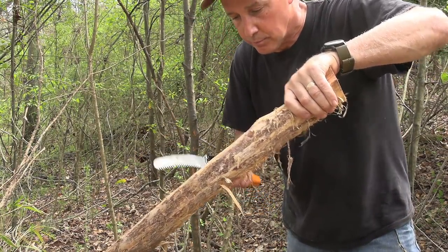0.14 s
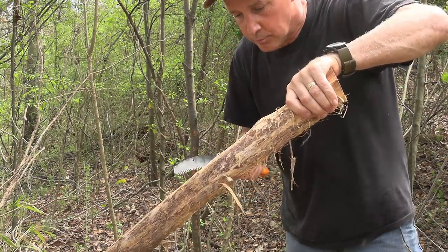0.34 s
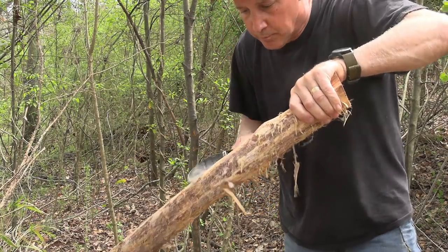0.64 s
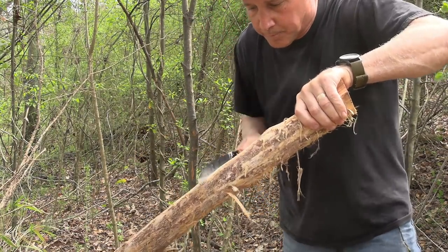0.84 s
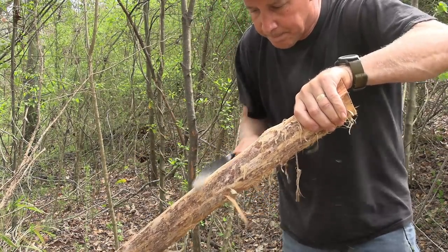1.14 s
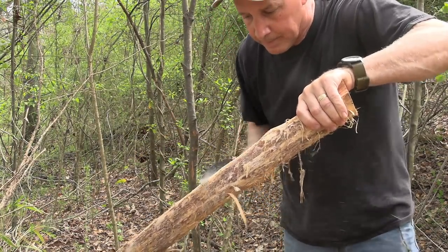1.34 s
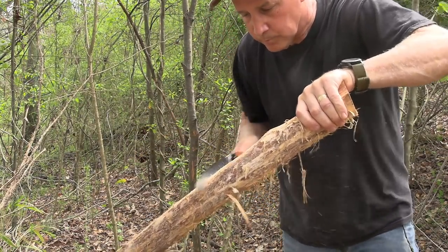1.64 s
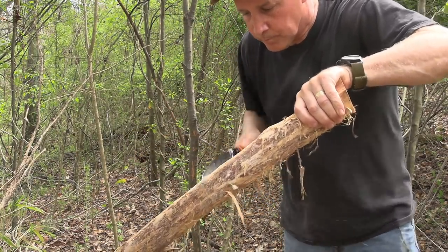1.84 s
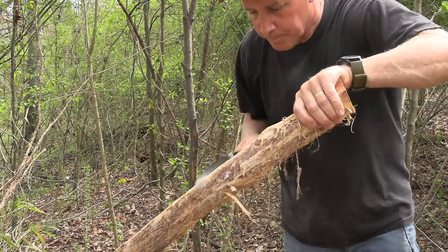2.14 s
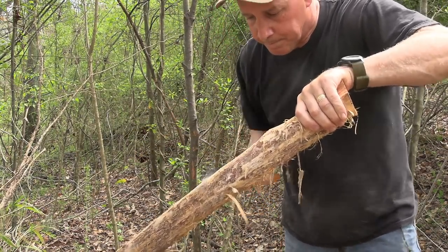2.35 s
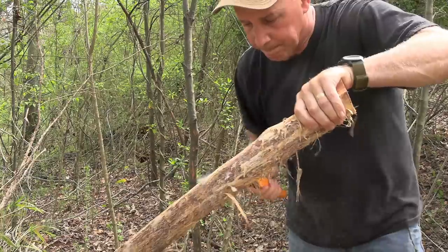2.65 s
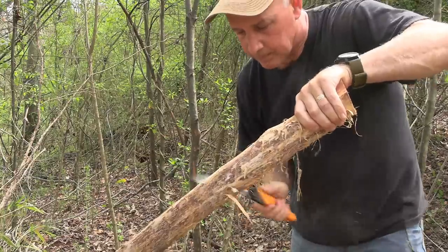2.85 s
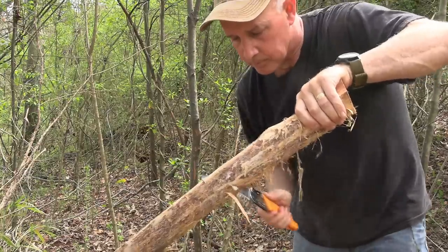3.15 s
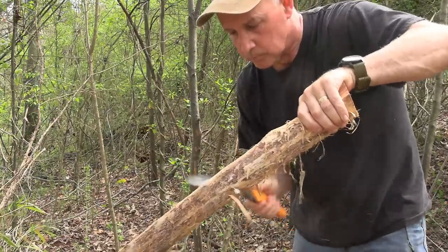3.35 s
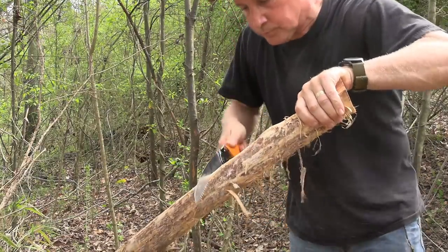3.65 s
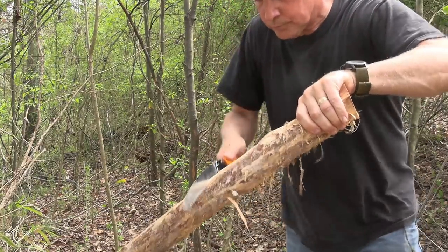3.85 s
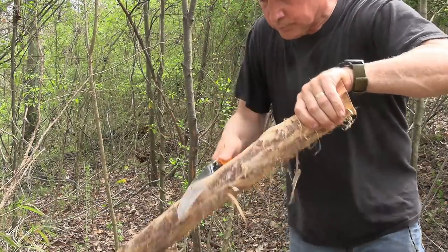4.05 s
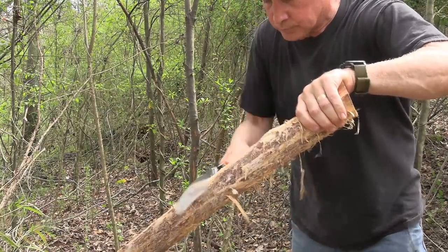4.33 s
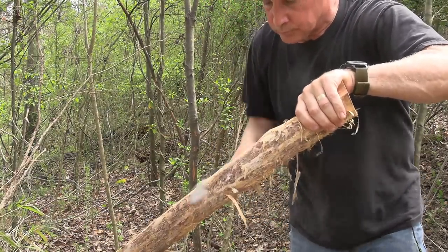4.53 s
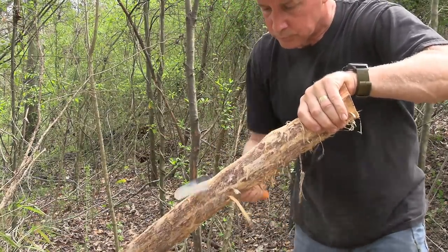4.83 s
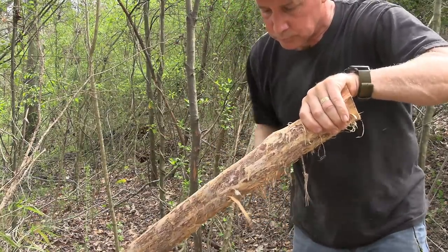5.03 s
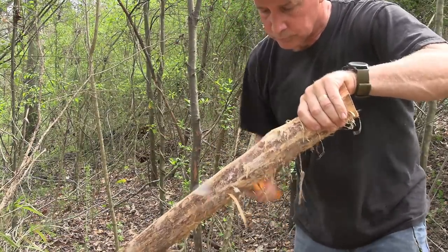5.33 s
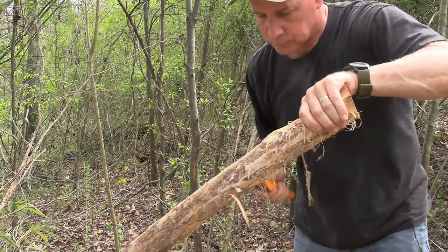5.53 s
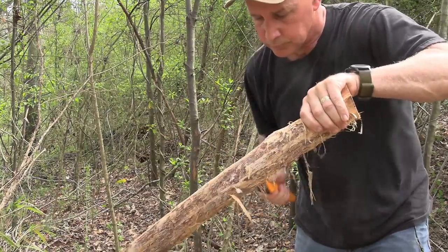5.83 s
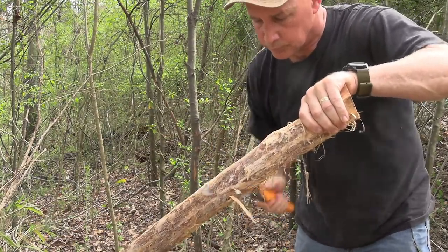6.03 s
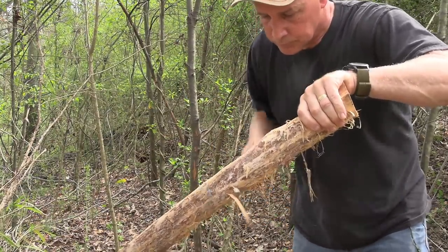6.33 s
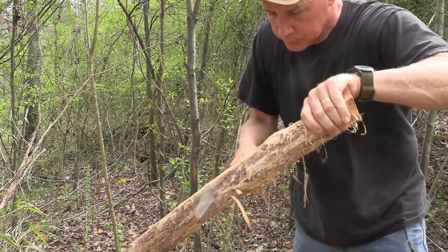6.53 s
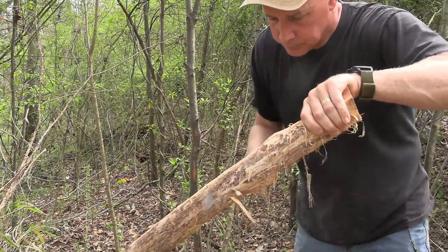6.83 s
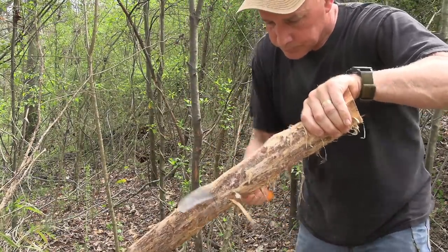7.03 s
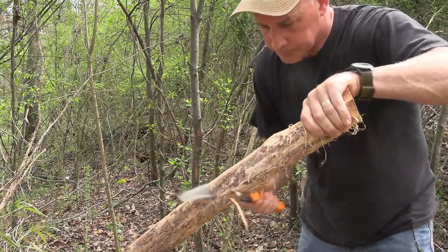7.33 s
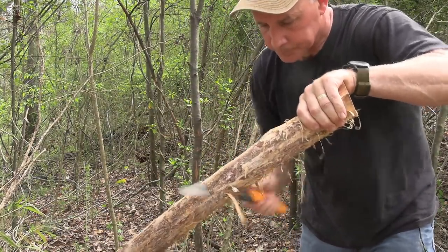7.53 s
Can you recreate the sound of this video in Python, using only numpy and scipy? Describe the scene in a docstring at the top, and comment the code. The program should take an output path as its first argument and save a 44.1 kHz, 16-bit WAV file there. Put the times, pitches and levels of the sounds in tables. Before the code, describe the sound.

In a wood, close to the microphone, a small hand saw cuts a dead limb with fast, alternating pull and push strokes, about seven or eight a second. Each stroke is a gritty, hollow woody rasp with a bright steely edge. A distant bird whistles downward twice early on. The sawing briefly rests near the middle, then resumes, as low wind rumble and buffeting grow heavy and later ease slightly.

```python
"""A folding pruning saw cuts a dead limb held in one hand, in a wood, close to the microphone.
A faint far-off roar (coloured noise) lasts throughout; from 0.2 s about seven and a half strokes a second,
pulls and pushes alternating: tearing fibres knock the limb's low resonances and ring the blade's treble.
A distant bird (gliding sines) falls twice before 0.9 s; the saw rests briefly near 3.7 s.
Wind rumble and buffeting on the microphone (noise under gusts) build to about 5.6 s, then ease."""
import sys
import numpy as np
from scipy import signal
from scipy.fft import rfft, irfft, next_fast_len
from scipy.io import wavfile
from scipy.ndimage import map_coordinates

SR = 44100
rng = np.random.default_rng(int(sys.argv[2]) if len(sys.argv) > 2 else 0)


def waveform_to_disk(signal):
    """Save audio, clipped to [-1, 1], as 16-bit WAV at the path in sys.argv[1]."""
    frames = np.transpose(np.atleast_2d(signal))
    scaled = np.clip(frames, -1, 1) * 32767
    samples = np.round(scaled).astype(np.int16)
    wavfile.write(sys.argv[1], SR, samples)


N = 338688
TIME = np.arange(N) / SR
FREQ = np.maximum(np.fft.rfftfreq(next_fast_len(N + 8192), 1 / SR), 1)  # no zero, for logs and division
SIZE = 2 * (len(FREQ) - 1)  # FFT length, with room for the filters to ring out
CATCH_S = 0.022  # the teeth catch this long after a stroke sets off

# pull strokes, the cutting direction: (start [s], length [s], force [dB], growl relative to force [dB])
PULL_STROKES = [(0.217, 0.16, -34.5, -4), (0.569, 0.138, -29, 3), (0.832, 0.124, -27.5, -2.5),
                (1.071, 0.12, -29.5, -5), (1.324, 0.12, -28, -22), (1.563, 0.133, -28.5, 0),
                (1.822, 0.122, -26.2, -5), (2.075, 0.141, -28.5, 1), (2.331, 0.134, -24.5, -6),
                (2.594, 0.12, -25, -1), (2.851, 0.134, -26, -4), (3.12, 0.116, -28.5, -15),
                (3.366, 0.154, -31.0, -9), (3.935, 0.12, -29.5, -5), (4.17, 0.164, -29.5, -5),
                (4.432, 0.148, -29.5, 1), (4.697, 0.145, -28, 1.5), (4.96, 0.155, -30, 0.5),
                (5.224, 0.157, -31.5, 2), (5.51, 0.135, -31.8, -3), (5.782, 0.14, -31, 0),
                (6.06, 0.139, -32, -6), (6.326, 0.155, -33.5, -6), (6.596, 0.155, -31.5, -6),
                (6.873, 0.159, -30.5, 3), (7.142, 0.15, -28.5, -6), (7.426, 0.14, -27, -2)]
# push strokes, the lighter return: (start [s], length [s], force [dB], growl relative to force [dB])
PUSH_STROKES = [(0.48, 0.094, -37, 11.5), (0.731, 0.11, -34.5, -10), (0.964, 0.12, -30, 2.5),
                (1.211, 0.1, -28.5, -1), (1.45, 0.11, -31.5, -11), (1.698, 0.12, -31.5, 2.5),
                (1.954, 0.115, -27, -5), (2.204, 0.13, -29.5, -2.5), (2.463, 0.13, -29, -4.5),
                (2.72, 0.14, -27.5, 1.5), (2.98, 0.13, -31.5, 5), (3.248, 0.12, -30.5, 1),
                (3.512, 0.125, -38, 0), (3.819, 0.069, -36.5, -17), (4.042, 0.13, -29.5, 0.5),
                (4.31, 0.12, -31.5, -8), (4.583, 0.12, -32.5, 5.5), (4.841, 0.12, -32.5, 2.5),
                (5.095, 0.146, -33.5, 2.5), (5.379, 0.12, -33.5, -3.5), (5.654, 0.13, -35, 2),
                (5.939, 0.119, -32.5, -2.5), (6.212, 0.12, -35.5, 1.5), (6.476, 0.12, -34, -9),
                (6.744, 0.12, -35, -2), (7.013, 0.132, -29.5, 6), (7.292, 0.12, -28.5, 1),
                (7.569, 0.13, -31, 0)]
# resonances of the steel blade: (frequency [Hz], width [Hz], relative level [dB])
BLADE_MODES = [(8580, 220, -2.5), (9950, 270, 0), (11000, 420, -3), (12000, 370, 2.5), (13500, 154, 9.5),
               (12900, 220, -8)]
# outline of the hiss of tearing fibres: (frequency [Hz], relative level [dB])
TEAR_OUTLINE = [(200, -58), (1000, 0), (2500, -27.5), (3500, -4.5), (5000, 1.5), (7000, 0), (9000, 6),
                (12000, -11), (16000, 4)]


def undb(db):
    """Decibels to gain."""
    return 10 ** (np.asarray(db) / 20)


def unit(x):
    """Scale to rms 1."""
    return x / np.sqrt(np.mean(np.abs(x) ** 2))


def noise():
    """White noise."""
    return rng.standard_normal(N)


def walk(rate):
    """A random wander with rms 1 that takes a new direction up to rate times a second."""
    return unit(np.interp(TIME * rate, np.arange(N // 16), rng.standard_normal(N // 16)))


def curve(rows):
    """Join (s, value) rows by straight lines."""
    return np.interp(TIME, *np.transpose(rows))


def filtered(x, response):
    """Apply a frequency response."""
    return irfft(rfft(x, SIZE) * response, SIZE)[:N]


def colour(x, points):
    """Filter by a (Hz, dB) outline, keeping the power of white noise."""
    hz, db = np.transpose(points)
    outline_db = np.interp(np.log(FREQ), np.log(hz), db)
    return filtered(x, unit(undb(outline_db)))


def resonance(hz, width, db):
    """Frequency response of one damped mode."""
    return undb(db) / (1 + 1j * (FREQ - hz * hz / FREQ) / width)


def ring(x, modes):
    """Drive (Hz, width, dB) resonances, keeping the power of white noise."""
    return filtered(x, unit(sum(resonance(*mode) for mode in modes)))


def die_away(blows, decay_s):
    """Let each blow decay exponentially."""
    return signal.lfilter([1], [1, -np.exp(-1 / (decay_s * SR))], blows)


def bursts(events, decay_s):
    """Envelope of sudden (s, dB) blows that die away."""
    s, db = np.transpose(events)
    blows = np.bincount((s * SR).astype(int), undb(db), N)
    return die_away(blows, decay_s)


def swing(t, start, crest, end):
    """Rise from rest to a crest and back to rest: a lopsided half sine."""
    return np.maximum(np.sin(np.pi * np.interp(t, [start, crest, end], [0, .5, 1])), 0)


def distance(waver_db=1):
    """A soft far-off roar among the trees: coloured noise that wavers a little."""
    # outline of the roar: (frequency [Hz], relative level [dB])
    roar_outline = [(60, -25), (130, 1.5), (250, -8), (400, -5), (750, -8.5), (1100, -18), (2000, -26.5),
                    (3000, -31.5), (5000, -33.5), (10000, -42), (16000, -74)]
    # level of the roar before its waver: (time [s], level [dB])
    roar_level = [(0, -42.5), (3, -42.5), (3.8, -46), (6, -47.5), (7.68, -46.5)]
    return colour(noise(), roar_outline) * undb(curve(roar_level) + waver_db * walk(10))


def bird():
    """Falling whistles from far away: gliding sines, blurred by the air between the trees."""
    # (start [s], end [s], first pitch [Hz], last pitch [Hz], level before flutter [dB])
    whistles = [(.41, 0.61, 3000, 2500, -60), (.68, 0.865, 2960, 2520, -53)]
    blur_hz, flutter_db = 35, 3
    out = 0
    for start, end, from_hz, to_hz, db in whistles:
        pitch_hz = curve([(start, from_hz), (end, to_hz)]) + blur_hz * walk(200)
        tone = np.sin(2 * np.pi * np.cumsum(pitch_hz) / SR)
        swell = swing(TIME, start, (start + end) / 2, end)
        out = out + undb(db + flutter_db * walk(59.6)) * swell * tone
    return out


def wind(buffet_db=0.5):
    """Eddies press on the microphone, the largest swings rounded off; gusts add faster buffeting."""
    # strength of the breeze at the microphone: (time [s], relative level [dB])
    breeze = [(0, -52), (.8, -45.5), (1.6, -43), (2.5, -32.5), (3.4, -32.5), (4.3, -26.5), (5.6, -20.5),
              (6.4, -23.5), (7.68, -28.5)]
    # gusts on top of the breeze: (peak time [s], relative level [dB])
    gusts = [(.23, -30), (1.11, -24.5), (1.902, -23), (3.1, -14), (5.05, -21.5), (5.55, -15.5),
             (6.159, -18), (6.45, -27), (7.12, -13)]
    # outline of the slow rumble: (frequency [Hz], relative level [dB])
    rumble_outline = [(5, -10.5), (12, 14.5), (22, 1.5), (34, 1.5), (48, -11), (62, -31.5), (100, -21.5),
                      (200, -93)]
    # outline of the faster buffeting: (frequency [Hz], relative level [dB])
    buffet_outline = [(30, -50), (48, 2.5), (60, 1.5), (80, -13.5), (110, -26), (150, -29.5), (250, -42),
                      (600, -70)]
    gust_rise_s, gust_fall_s = 0.044, 0.048
    lurch_db, lurches_per_s = 1.5, 12  # the wind also lurches at random
    # the rumble has this level at the usual wind, and grows by this many dB per dB of wind
    rumble_db, usual_wind_db, rumble_growth = -9.5, -27, 0.3
    ceiling = .76  # largest swing of the wind rumble and buffeting

    strength = undb(curve(breeze))
    for peak, db in gusts:
        age = TIME - peak
        spread_s = np.where(age < 0, gust_rise_s, gust_fall_s)
        strength = strength + undb(db) * np.exp(-(age / spread_s) ** 2)
    strength = strength * undb(lurch_db * walk(lurches_per_s))
    rumble_gain = undb(rumble_db) * (strength / undb(usual_wind_db)) ** rumble_growth
    slow = rumble_gain * colour(noise(), rumble_outline)
    fast = undb(buffet_db) * strength * colour(noise(), buffet_outline)
    return ceiling * np.tanh((slow + fast) / ceiling)


def trees(x, echo_db=-24, dull_hz=5000):
    """Trunks scatter a thin, dull tail: decaying noise through a gentle low-pass."""
    t60_s = .28
    tail = noise() * np.exp(-np.log(1000) * TIME / t60_s) * (TIME > .012)  # first echo after 12 ms
    tail = filtered(tail / np.sqrt(np.sum(tail ** 2)), 1 / (1 + 1j * FREQ / dull_hz))
    return undb(echo_db) * signal.fftconvolve(x, tail)[:N]


def crumbs(db, decay_s=0.003):
    """From the first push on, splinters and sawdust crackle faintly, also between strokes."""
    per_second, scatter_db = 450, 4
    begun = TIME > PUSH_STROKES[0][0]
    ticks = (rng.random(N) < per_second / SR) * undb(scatter_db * noise()) * begun
    crackle = die_away(ticks, decay_s) * noise()
    return undb(db) * ring(crackle, [(3000, 5000, 6.5), (7700, 3500, 2.5)])


def jolts(limb, db=-5):
    """The blade jams: each jam is one hard, brief push that knocks the limb's resonances."""
    # (time [s], relative level [dB])
    jams = [(2.803, -7), (4.135, -29), (4.144, -7), (4.922, -27)]
    push_s = .0003
    return undb(db) * ring(bursts(jams, push_s), limb)


def snags(blade_db=-2, tear_db=-8):
    """A tooth catches and snaps free with a bright tick; the fibre crackles on for a moment."""
    # single snags, faint to hard, where teeth skip or a fibre snaps:
    # (time [s], relative level [dB], blade ring relative to it [dB])
    single_snags = [(.1955, -39, -22), (.2642, -17, -7.5), (.2797, -17.5, -1), (.298, -17, -16),
                    (.342, -23, 1.5), (.52, -28, 8), (1.098, -24, -3), (1.5095, -19.5, 0.5),
                    (1.9692, -25, -6), (2.0959, -18, -8), (2.2248, -26, -8), (2.3523, -16, -16),
                    (3.015, -20, -25), (3.1464, -13, -10), (3.3955, -27, -14), (3.7255, -31, -29),
                    (3.7758, -23.5, -25), (3.9555, -27, -12), (4.4537, -18.5, -9), (6.1207, -16, -7)]
    decay_s, tail_s, tail_db = .0011, .014, -10
    # the catch as each pull sets off: level relative to its force, blade ring, random spread of level
    catch_db, catch_ring_db, scatter_db = -7, -14, 2.5

    ticks = list(single_snags)
    for start, _, force_db, _ in PULL_STROKES:
        luck_db = scatter_db * rng.standard_normal()
        ticks.append((start + CATCH_S, force_db + catch_db + luck_db, catch_ring_db))

    def snap(events):
        """Noise under a sharp tick and its weaker tail."""
        return (bursts(events, decay_s) + undb(tail_db) * bursts(events, tail_s)) * noise()

    fibres = snap([(s, db) for s, db, _ in ticks])
    steel = snap([(s, db + ring_db) for s, db, ring_db in ticks])
    return undb(blade_db) * ring(steel, BLADE_MODES) + undb(tear_db) * colour(fibres, TEAR_OUTLINE)


def break_free(age, stick_s, skid_db=-20):
    """After each turn the teeth drag briefly, then ease loose: a gate for the rasp and the skid's envelope."""
    drag_db, release_s, skid_s = -3, .012, .015
    loose = np.clip((age - stick_s) / release_s + .5, 0, 1)
    gate = undb(drag_db * (1 - loose))
    skid = loose * undb(skid_db) * np.exp(-np.abs(age - stick_s) / skid_s)
    return gate, skid


def arm(strokes, style, wood_peakiness, rattle=0.07, coast=.6, dig=2.6):
    """Tooth rate, strength of the rasp, force on the wood and strength of the growl through all strokes."""
    bite_lag_s = .008  # the teeth bite deepest just after the fastest moment
    usual_stroke_s = .13  # tooth rates hold for this length and scale with 1 / length
    rate, rasp, bite, growl = np.zeros((4, N))
    when, *habits = np.transpose(style)
    for start, length, force_db, growl_db in strokes:
        share, pointed, tooth_hz, hiss_db = (np.interp(start, when, habit) for habit in habits)
        end = start + length
        fastest = start + length * np.clip(share, .1, .85)
        on = slice(int(start * SR), int(end * SR))
        speed = swing(TIME[on], start, fastest, end)
        press = swing(TIME[on], start, min(fastest + bite_lag_s, end), end)
        gate, skid = break_free(TIME[on] - start, CATCH_S)
        rate[on] = tooth_hz * usual_stroke_s / length * press ** coast
        rasp[on] += undb(force_db + hiss_db / 2) * (gate * speed ** pointed + skid)
        # growling teeth also rattle the wood harder
        wood_db = force_db - hiss_db / 2 + rattle * growl_db
        bite[on] += undb(wood_db) * press ** (pointed * wood_peakiness)
        # the growl sounds only while the teeth dig in
        growl[on] += undb(force_db + growl_db) * press ** (pointed + dig)
    return rate, rasp, bite, growl


def teeth(phase, scatter_db=3.0, fade=1.0, rub=1.0, fibre_db=3):
    """Each passing tooth tears a bundle of fibres: a crackle that weakens until the next tooth bites."""
    tooth_strength = undb(scatter_db * noise())[phase.astype(int) % N]
    grip = tooth_strength * np.exp(-(phase % 1) / fade)
    return unit((rub + grip) * noise() * undb(fibre_db * noise()))


def shake(x, modes, shift_db=3, pivot_hz=850):
    """Drive the limb; as the blade rocks in the cut, each mode is caught now more, now less."""
    # hardness of the teeth's contact, favouring the limb's upper modes: (time [s], tilt [dB per octave])
    contact_tilt = [(0, -0.8), (1.8, -1.2), (2.55, -0.5), (3.3, 0.7), (3.9, -2.9), (4.2, -0.5), (5.3, -0.9),
                    (6.8, -1.5), (7.68, 0)]
    responses = [resonance(*mode) for mode in modes]
    hardness = curve(contact_tilt)
    spectrum = 0
    for (hz, _, _), response in zip(modes, responses):
        caught_db = shift_db * walk(22) + hardness * np.log2(hz / pivot_hz)
        spectrum = spectrum + rfft(x * undb(caught_db), SIZE) * response
    return irfft(spectrum, SIZE)[:N] / np.sqrt(np.mean(np.abs(sum(responses)) ** 2))


def waver(x, lag_s=0.000593):
    """The blade moves along the cut, so every resonance slides a percent or two in pitch."""
    return map_coordinates(x, [(TIME + lag_s * walk(14)) * SR], order=3)


def saw(motion, limb, wood_db, growl_db, blade_db, tear_db, uneven_db, overtone, stumble=.09, buried=0.25):
    """Strokes in one direction: the teeth shake the limb and the blade, and the fibres hiss as they part."""
    # the deeper the blade sinks, the more the wood muffles its ring: (time [s], level [dB])
    muffling = [(0, -1), (1, 0), (2.6, -4), (3.3, -4), (7.68, -5.5)]
    rate, rasp, bite, growl = motion
    phase = np.cumsum(rate * np.exp(stumble * walk(250))) / SR  # counts teeth
    grain = undb(uneven_db * walk(110))  # hard and soft patches in the wood
    cut = teeth(phase) * grain
    # the row of teeth bumps over the edge of the cut: a short growl that rises and falls with the stroke
    bumps = np.sin(2 * np.pi * phase)
    bumps += overtone * np.sin(4 * np.pi * phase)
    bumps += overtone ** 2 * np.sin(6 * np.pi * phase)
    drive = undb(wood_db) * cut * bite + undb(growl_db) * bumps * growl * grain
    wood = shake(drive, limb)
    free = undb(curve(muffling))
    blade = undb(blade_db) * ring(cut * rasp * free, BLADE_MODES)
    # the cut shields the hiss a little too
    hiss = teeth(phase) * grain * rasp * free ** buried
    tear = undb(tear_db) * colour(hiss, TEAR_OUTLINE)
    return waver(wood + blade) + tear


def scene():
    """The saw close by among the trees, with wind on the microphone and the distance behind."""
    # the limb with the blade in its cut:
    # (frequency [Hz], width [Hz], relative level on the pull [dB], relative level on the push [dB])
    limb_modes = [(228.7, 15.3, -56, -1), (276.5, 85, -3, 1.5), (470.5, 61, -3.5, 4.5), (549, 62, -2.5, -1),
                  (701, 44, -6, -8), (824, 283, -7.5, -1), (1200, 230, -15.5, -9), (1358, 31.4, 1.5, 6.5),
                  (1627, 35, -12.5, -11), (1663, 66, -8, 4.5), (1870, 37, -8, 0), (1997, 58, -9.5, -10),
                  (2248, 35, -2, -1.5), (2690, 110, -21, -33), (3010, 67, -20, -15)]
    # how the pull changes as the cut deepens: (time [s], share of the stroke gone when fastest [0-1],
    # pointedness of the swell [exponent], top tooth rate in a 0.13 s stroke [Hz], hiss against wood [dB])
    pull_style = [(1.1, 0.62, 1.86, 255.6, -1.5), (1.5, 0.58, 2.36, 469, -1.5),
                  (2.699, 0.55, 1.56, 481.3, 1), (3.1, .46, 1.92, 537.5, -1.5), (7.4, 0.49, 2.07, 557, 0)]
    # how the push changes: (time [s], share gone when fastest [0-1], pointedness [exponent],
    # top tooth rate in a 0.13 s stroke [Hz], hiss against wood [dB])
    push_style = [(0.501, .6, 1.7, 148, 1), (1.201, 0.66, 2.18, 205, 1.2), (3, .68, 1.7, 229.9, -2.04),
                  (5.6, .67, 1.58, 229.9, 1.2), (7.6, .67, 1.77, 231.6, -1.5)]
    pull_modes = [(hz, width, db) for hz, width, db, _ in limb_modes]
    push_modes = [(hz, width, db) for hz, width, _, db in limb_modes]
    background = distance() + bird() + wind()
    pulling = arm(PULL_STROKES, pull_style, wood_peakiness=0.95)
    pushing = arm(PUSH_STROKES, push_style, wood_peakiness=1.14)
    pulls = saw(pulling, pull_modes, wood_db=0.5, growl_db=-16.5, blade_db=3.5, tear_db=2,
                uneven_db=1.5, overtone=.5)
    pushes = saw(pushing, push_modes, wood_db=0.5, growl_db=-15.0, blade_db=1, tear_db=0,
                 uneven_db=1.5, overtone=0.69)
    work = pulls + pushes + snags() + jolts(pull_modes) + crumbs(db=-56.5)
    return (background + work + trees(work))[None]


def record(dry):
    """A steep elliptic low-pass cuts the top of the treble."""
    top_hz = 15800
    low_pass = signal.ellip(10, .2, 80, top_hz, fs=SR, output="sos")  # 0.2 dB ripple, 80 dB stop
    return signal.sosfilt(low_pass, dry)


dry = scene()
out = record(dry)
waveform_to_disk(out)
```